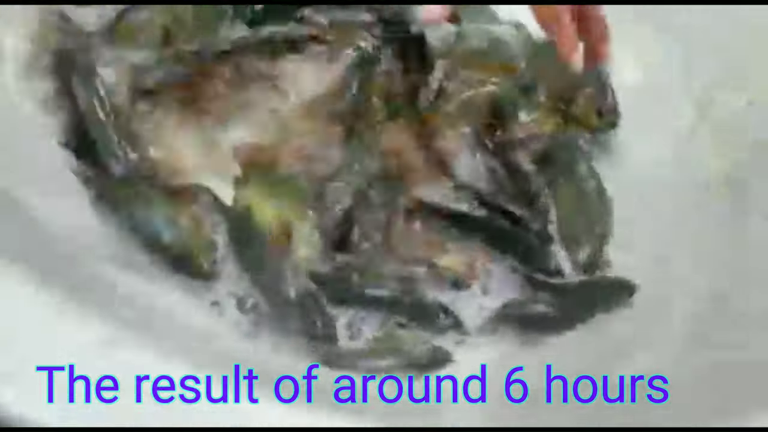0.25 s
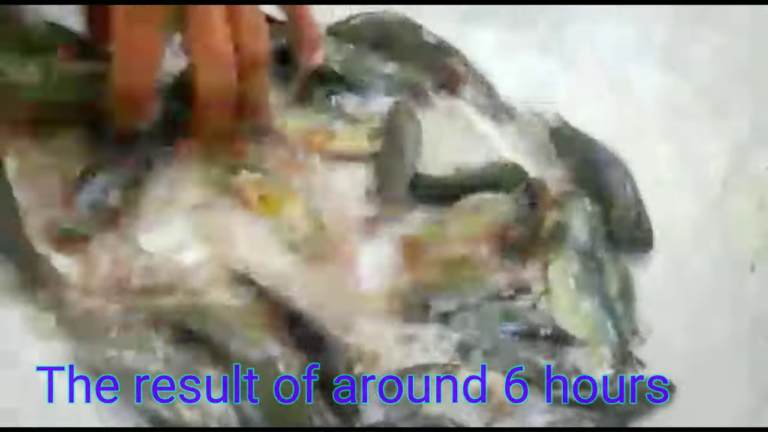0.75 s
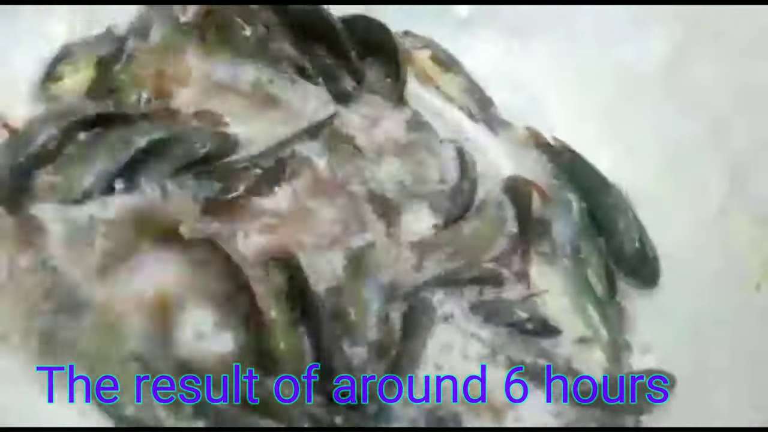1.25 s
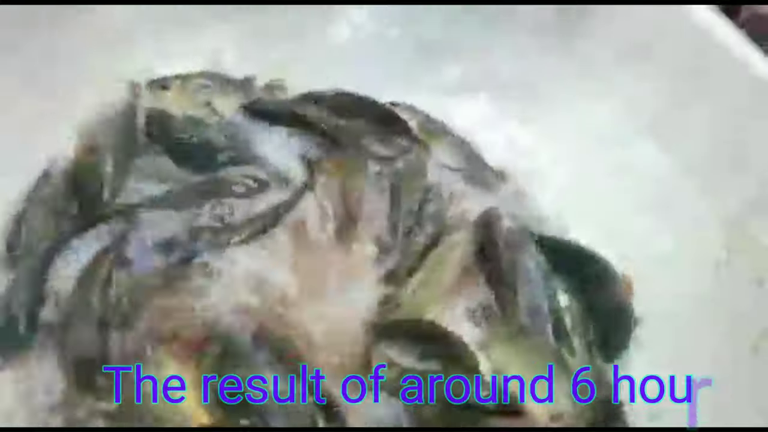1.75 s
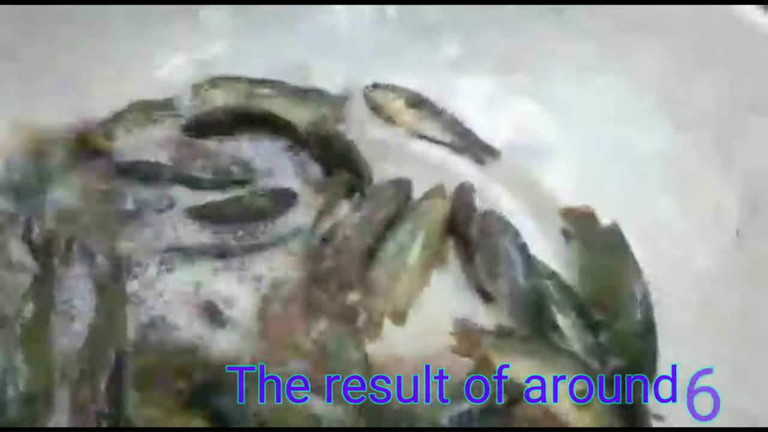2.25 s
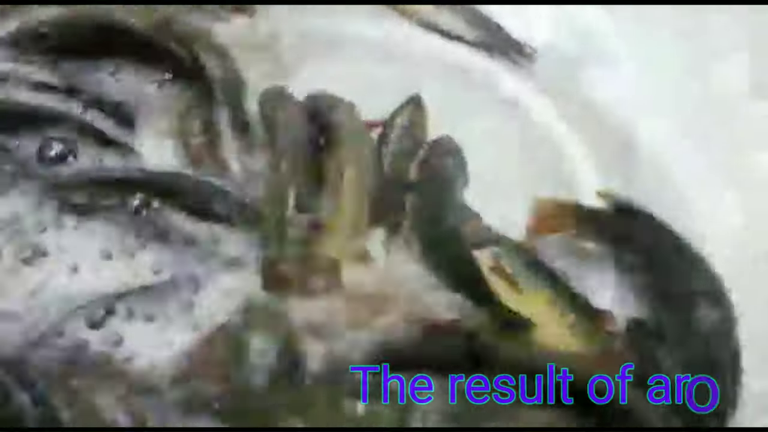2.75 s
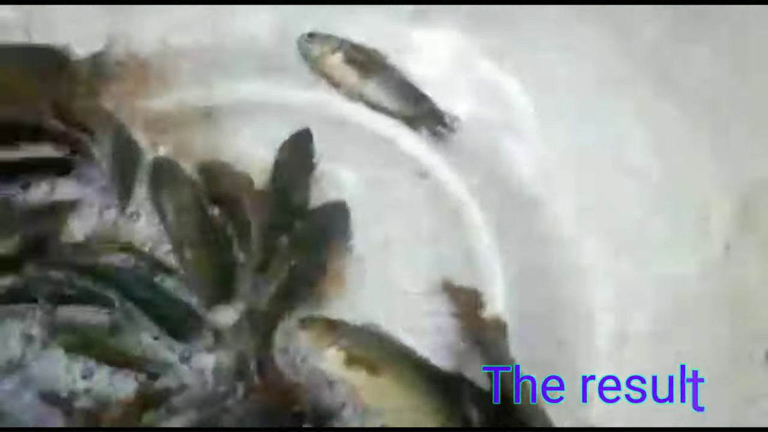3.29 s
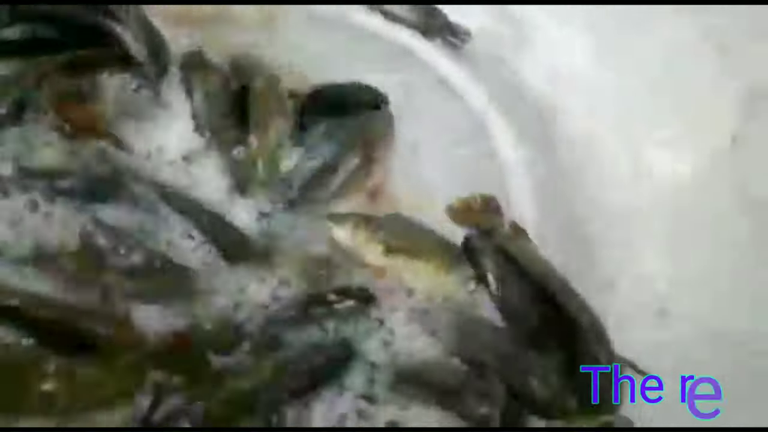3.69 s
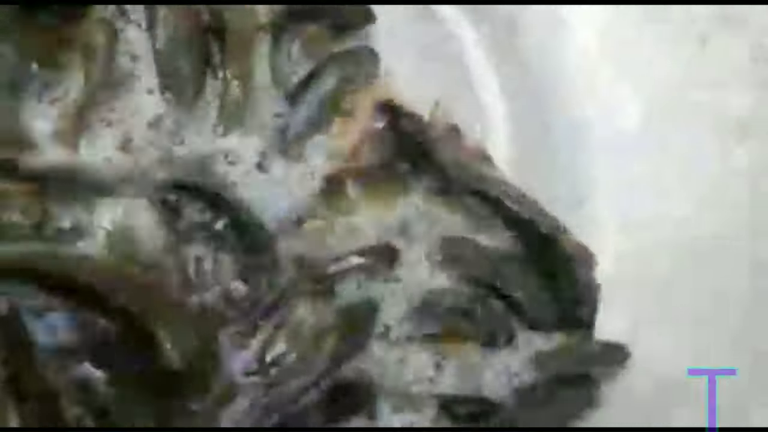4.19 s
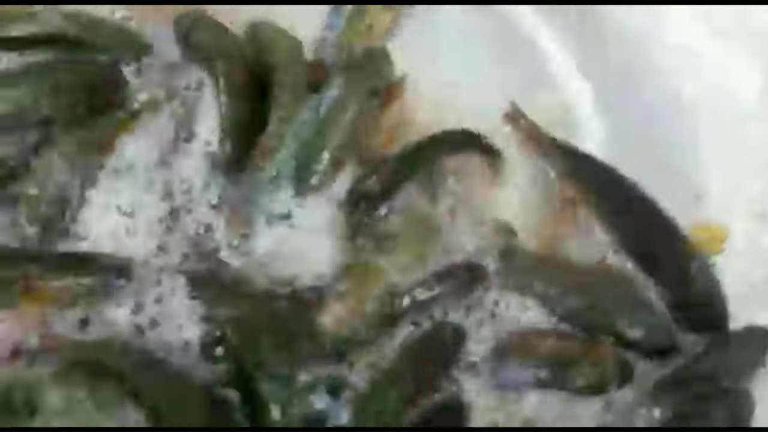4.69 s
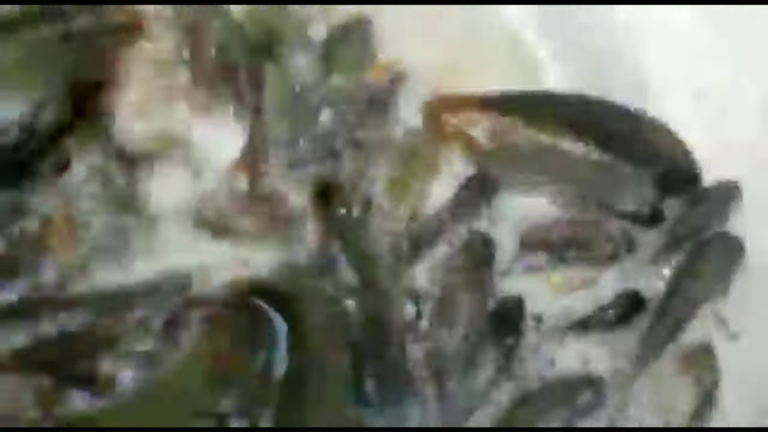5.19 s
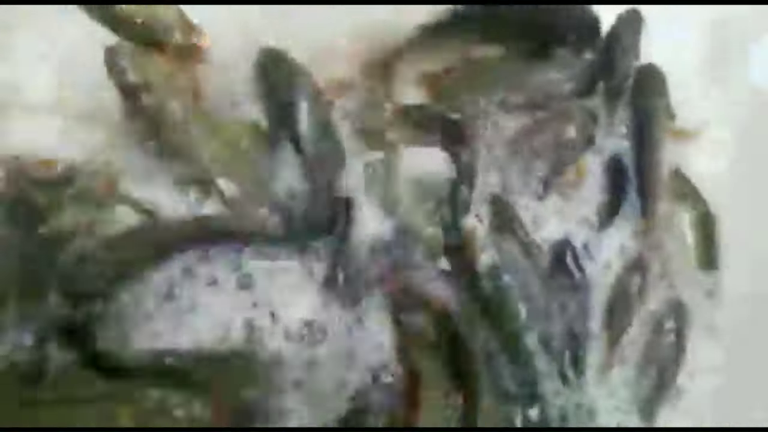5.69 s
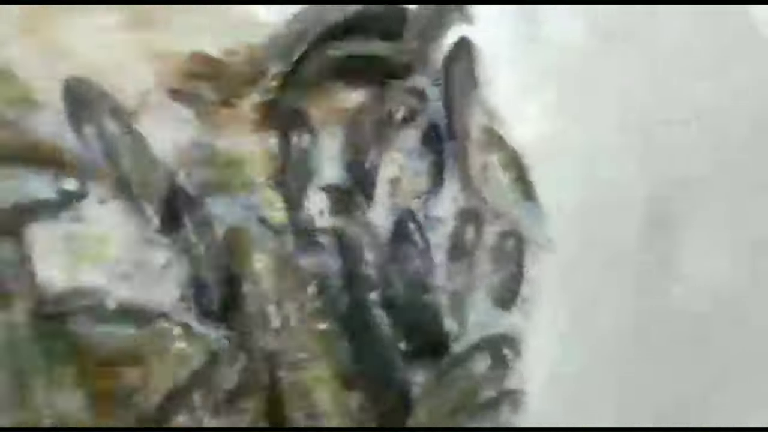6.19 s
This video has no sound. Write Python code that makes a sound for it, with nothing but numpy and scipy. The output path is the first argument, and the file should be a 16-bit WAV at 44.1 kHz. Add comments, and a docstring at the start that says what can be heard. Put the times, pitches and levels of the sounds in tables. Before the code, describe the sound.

Very close to a small plastic basin, a heap of live fish writhes in shallow foamy water. A fluttering wet crackle, high bubbly foam and faint low rumble run throughout. From 0.2 to 0.8 s tail flicks come quickly, as crisp millisecond sprays with tiny bubbles; a strong one lands near 1.1 s with a swell of squirming, and more follow until 1.7 s. Activity is sparser around 2.2 to 2.9 s, with isolated snaps. Loud blunt drop taps strike at about 3.2 s and 3.9 to 4.2 s, with low slosh near 3.5 s and soft wall knocks around 3.3 s. At 4.45 s a bump, deep plop and tap coincide. Squirms surge near 4.8 to 5 s, flicks cluster at 5.2 s, one snaps at 5.5 s, paired taps hit at 5.9 s, and wet spatters and squirming continue until 6.4 s.

```python
"""A heap of small live fish thrashes in a little foamy water in a plastic basin, close under a phone.
Wriggling bodies give a steady wet crackle of noise grains and small ringing bubbles over low sloshing.
Tail flicks are bursts of spray noise with clusters of tiny bubbles; larger air pockets plop as lower ones.
Fish bump the basin wall, heard as damped modes, and flung drops tap the phone as short pressure pulses.
The walls add brief reflections, and steady fizz and rumble lie behind it all."""
import sys
import numpy as np
from scipy import signal
from scipy.fft import rfft, irfft
from scipy.io import wavfile

SR = 44100
rng = np.random.default_rng(int(sys.argv[2]) if len(sys.argv) > 2 else 0)


def log_audio(samples):
    """Write samples as a 16-bit WAV file to the path given in sys.argv[1]."""
    # one column per channel
    frames = np.atleast_2d(samples).T
    # limit to full scale, then quantise
    limited = np.clip(frames, -1, 1)
    pcm = np.round(limited * 32767).astype(np.int16)
    wavfile.write(sys.argv[1], SR, pcm)


N = 284004
T = np.arange(N) / SR  # seconds

# Slow restlessness of the whole heap. Each row: time in seconds, level in dB.
HEAP_UNREST = [(0, -35.5), (.65, -38.5), (1, -29.5), (1.4, -40.5), (2.1, -40), (2.7, -35), (3.3, -36.5),
               (3.8, -39.5), (4.7, -45), (5.4, -40.5), (6.44, -41)]
# Longer squirms of one fish through the heap.
# Each row: height of the swell in seconds, half its span in seconds, level in dB.
SQUIRM_EVENTS = [(0.5, 0.013, -25), (0.888, 0.064, -31), (1.152, 0.02, -25.5), (1.68, 0.1, -34),
                 (2.431, 0.065, -28), (3.238, 0.05, -29.5), (3.474, 0.036, -25), (3.614, 0.05, -31),
                 (3.903, 0.032, -36), (4.164, 0.011, -27.5), (4.812, 0.026, -21.5), (4.986, 0.024, -26),
                 (5.049, 0.014, -24), (5.552, 0.064, -29), (5.784, 0.034, -30.5), (6.175, 0.061, -23),
                 (6.417, 0.0053, -21)]
# Water moving under the heap. Each row: time in seconds, level in dB.
SLOSH_LEVELS = [(0, -45.5), (1.05, -58.5), (1.5, -75), (2.35, -48), (2.9, -51), (3.48, -38.5), (3.75, -49),
                (4.7, -52.5), (5.5, -47.5), (6.44, -50.5)]
# Steady background of wet fizz and room rumble. Each row: frequency in Hz, relative gain in dB.
BACKGROUND_COLOUR = [(25, -41), (60, -3), (220, -1.5), (500, -10), (2200, -9.5), (3400, -4.5), (5500, -3.5),
                     (8000, -15.5), (15500, -29.5)]
# Drops landing on the phone, the heavy ones lower.
# Each row: landing in seconds, relative level in dB, pitch in Hz.
DROP_TAPS = [(0.097, -28, 700), (0.9055, -20.5, 325), (1.0743, -18, 386), (1.739, -24.5, 192),
             (2.603, -13, 700), (3.2077, -4, 900), (3.4193, -17.5, 577), (3.541, -18.5, 476),
             (3.6013, -17, 544), (3.8258, -17.5, 303), (3.9248, -9, 563), (3.9295, -4, 764),
             (4.0365, -5, 830), (4.041, -2.5, 390), (4.1679, -1.5, 405), (4.462, -6.5, 189),
             (4.4727, -17.5, 400), (5.8834, -2, 720), (5.8854, -3.5, 760), (5.965, -22, 216),
             (6.3812, -14, 464)]
# Larger air pockets closing between the fish. Each row: start in seconds, relative level in dB, pitch in Hz.
AIR_PLOPS = [(0.212, -19.5, 1700), (0.905, -16, 2700), (1.076, -21, 1000), (1.146, -26, 1800),
             (1.184, -9.5, 2880), (1.243, -23.5, 1460), (1.43, -16.5, 1430), (3.597, -20, 390),
             (3.774, -19.5, 107), (4.451, -8.5, 110), (4.4589, -7.5, 1080), (4.4598, -8, 1690),
             (4.783, -29, 424), (4.949, -23, 463), (4.977, -25, 1510), (5.005, -10, 550),
             (5.051, -24, 2370), (5.185, -13.5, 1290), (5.274, -17.5, 1120), (6.191, -10, 1630)]
# Tail flicks. Each row: start in seconds, level in dB, central bubble pitch in Hz, nominal length in seconds,
# relative level of the finest mist in dB.
TAIL_FLICKS = [(0.241, -19, 3180, 0.009, 0), (0.318, -21, 3830, 0.0043, -11),
               (0.366, -17.5, 4060, 0.0051, -2), (0.416, -20, 4530, 0.0038, 1),
               (0.472, -24.5, 3380, 0.0066, -6), (0.559, -22, 2920, 0.0057, -6),
               (0.637, -25.5, 3900, 0.0022, -28), (0.75, -17, 4700, 0.0022, -21),
               (0.77, -20, 4500, 0.01, -12), (0.98, -25, 3260, 0.0052, -21),
               (1.011, -26.5, 4700, 0.0059, -3), (1.075, -13, 3900, 0.0041, -2),
               (1.2, -27, 3060, 0.007, 13), (1.32, -26.5, 3560, 0.0032, -34),
               (1.441, -22, 2900, 0.0041, -7), (1.466, -22, 3230, 0.0039, -12),
               (1.511, -27, 2940, 0.004, 1), (1.637, -21.5, 2820, 0.0057, -18),
               (1.6578, -17, 5840, 0.002, -4), (1.713, -23, 3080, 0.0017, -16),
               (2.19, -17, 5700, 0.0025, -10), (2.533, -16, 3400, 0.004, -40),
               (2.575, -17.5, 3250, 0.0033, -17), (2.585, -23, 3750, 0.0069, -19),
               (2.905, -26, 3600, 0.00193, 0), (4.192, -16.5, 3140, 0.0046, -7),
               (4.22, -19, 3360, 0.0042, -1), (4.286, -18.5, 3850, 0.0037, -11),
               (4.458, -20, 3870, 0.00342, -2), (4.593, -25, 3930, 0.0016, 4),
               (4.82, -25.5, 4850, 0.0063, -6), (4.842, -24, 3160, 0.0066, -5),
               (5.187, -17, 3370, 0.009, -3), (5.2, -21.5, 4200, 0.012, -18),
               (5.204, -16.5, 2780, 0.0054, -7), (5.225, -21, 4500, 0.0057, -8),
               (5.291, -18, 3540, 0.0036, -28), (5.384, -23.5, 4930, 0.005, 1),
               (5.53, -14.5, 4170, 0.0054, -35), (6.001, -25.5, 4500, 0.005, 14),
               (6.021, -26.5, 3850, 0.0085, -19), (6.128, -21, 5250, 0.0059, -12),
               (6.189, -24.5, 3550, 0.0068, -2)]
# Colour of bursting spray. Each row: frequency in Hz, gain in dB.
SPRAY_COLOUR = [(60, -44.5), (200, -9.5), (600, -4), (1200, -12), (2100, -15.5), (3100, 2.5), (5700, -1.5),
                (8000, -9), (15500, -24.5)]
# Fish bumping the basin wall. Each row: start in seconds, relative level in dB, contact time in seconds.
WALL_BUMPS = [(1.074, -25, 0.0011), (3.124, -24.5, 0.0018), (3.259, -17.5, 0.0027), (3.339, -23, 0.0022),
              (3.356, -30, 0.00074), (4.449, -9.5, 0.005), (5.005, -16, 0.0015), (5.808, -16, 0.0028)]
# Modes of the water-loaded basin.
# Each row: settled frequency in Hz, relative level in dB, time to fall 60 dB in seconds.
WALL_MODES = [(183, -0.5, 0.093), (336, 8.5, 0.026), (536, -3, 0.046)]
# Response of the phone's microphone port. Each row: frequency in Hz, gain in dB.
PORT_RESPONSE = [(25, -32), (60, -6.5), (130, 0), (6000, 0.5), (8700, -10), (11500, 3.5), (15500, 3)]

FLOOR_DB = -44.5  # background level ahead of the microphone port
TOP_HZ = 15800  # upper limit of the phone
# A flick stirs the neighbours: level against the flick, time to build as the fish bends, time to settle.
STIR_DB, STIR_BUILD_S, STIR_SETTLE_S = -13, 0.009, 0.037


def undb(db):
    """Decibels to gain."""
    return 10 ** (np.asarray(db) / 20)


def unit(x):
    """Scale to rms 1."""
    return x / np.sqrt(np.mean(x ** 2) + 1e-18)


def add(out, at, sound):
    """Mix a sound into out at a time in seconds."""
    i = max(int(at * SR), 0)
    part = sound[:max(len(out) - i, 0)]
    out[i:i + len(part)] += part


def butter(x, hz, kind, order=2):
    """Low-pass or high-pass."""
    sos = signal.butter(order, min(hz, SR / 2 - 1), kind, fs=SR, output="sos")
    return signal.sosfilt(sos, x)


def colour(x, points, size=4096):
    """Causal filter through (Hz, dB) points, made minimum-phase by folding the cepstrum."""
    hz, db = np.transpose(points)
    bins = np.fft.rfftfreq(size, 1 / SR) + 1
    log_gain = np.interp(np.log(bins), np.log(hz), np.log(undb(db)))
    cepstrum = irfft(log_gain)[:size // 2]
    cepstrum[1:] *= 2
    impulse = irfft(np.exp(rfft(cepstrum, size)))
    return signal.fftconvolve(x, impulse)[:len(x)]


def sizes(count):
    """Many small grains and a few bigger ones, none far above the rest."""
    spread_db, most_db = 4.5, 14
    return undb(np.minimum(spread_db * rng.exponential(size=count), most_db))


def bubble(hz, cycles, glide=0.082, rise_cycles=0.41):
    """A ringing air pocket that swells quickly and climbs in pitch as it nears the surface."""
    turns = np.arange(int(cycles * SR / hz) + 2) * hz / SR
    decay = np.exp(-np.log(1000) * turns / cycles)  # down 60 dB after the given cycles
    envelope = (1 - np.exp(-turns / rise_cycles)) * decay
    return envelope * np.sin(2 * np.pi * turns * (1 + glide * turns / cycles / 2))


def cluster(hz, length, cycles, scatter, count):
    """Bubbles of like size pinched off in quick succession; the first is the strongest."""
    out = np.zeros(SR // 10)
    add(out, 0, bubble(hz, cycles))
    for k in range(1, count):
        when = rng.random() * length
        pitch = hz * 2 ** (scatter * rng.standard_normal())
        add(out, when, bubble(pitch, cycles) / np.sqrt(k + 1))
    return out


def bubbles(rate, centre_hz, octaves, cycles, length=.004, scatter=0.11):
    """A stream of small bubble clusters, each with its own pitch, at so many per second."""
    out, count = np.zeros(N), int(rate * N / SR)
    for (when, pitch, life), size in zip(rng.random((count, 3)), sizes(count)):
        hz = centre_hz * 2 ** (octaves * (2 * pitch - 1))
        group = cluster(hz, length, cycles * (.5 + life), scatter, count=3)
        add(out, when * N / SR, size * group)
    return unit(out)


def agitation():
    """How hard the heap moves: its slow unrest, a swell for each squirm and a stir round each flick."""
    power = undb(np.interp(T, *np.transpose(HEAP_UNREST))) ** 2
    for at, length, db in SQUIRM_EVENTS:
        swell = np.hanning(int(2 * length * SR))
        add(power, at - length, (undb(db) * swell) ** 2)
    t = T[:SR // 2] - T[SR // 10]  # the stir begins ahead of the flick
    stir = np.exp(np.minimum(t / STIR_BUILD_S, -t / STIR_SETTLE_S))
    for at, db, *_ in TAIL_FLICKS:
        add(power, at + t[0], (undb(db + STIR_DB) * stir) ** 2)
    # the writhing comes in uneven flutters
    flutter_s, flutter_db = .02, 1.4
    knots = np.arange(0, T[-1], flutter_s)
    flutter = np.interp(T, knots, rng.standard_normal(len(knots)))
    return np.sqrt(power) * undb(flutter_db * flutter)


def wriggling(crackle_db=-7.0, foam_db=-5.0, plip_db=-14, prick_db=-24):
    """Slippery bodies part and smack together; foam fizzes and pricks between them and the gaps plip as they fill."""
    smacks_per_s, smear_s = 380, .0014
    count = int(smacks_per_s * N / SR)
    smacks = np.zeros(N)
    smacks[rng.integers(0, N, count)] = sizes(count) ** 2
    # each smack dies away as a short grain of noise
    power = signal.lfilter([1], [1, -np.exp(-1 / (smear_s * SR))], smacks)
    crackle = unit(colour(np.sqrt(power) * rng.standard_normal(N), SPRAY_COLOUR))
    foam = bubbles(rate=250, centre_hz=3960, octaves=0.55, cycles=26)
    plips = bubbles(rate=110, centre_hz=1710, octaves=0.6, cycles=13)
    pricks = bubbles(rate=14, centre_hz=10900, octaves=0.34, cycles=4.5)
    wet = undb(crackle_db) * crackle + undb(foam_db) * foam
    wet += undb(plip_db) * plips + undb(prick_db) * pricks
    return agitation() * wet


def sloshing():
    """Low, heavily damped bubbles run together as gurgles in the water under the heap."""
    gurgles = bubbles(rate=170, centre_hz=275, octaves=0.68, cycles=3.2)
    return undb(np.interp(T, *np.transpose(SLOSH_LEVELS))) * gurgles


def background():
    """Steady noise coloured as distant wet fizz and room rumble."""
    return undb(FLOOR_DB) * unit(colour(rng.standard_normal(N), BACKGROUND_COLOUR))


def taps(push=1.32, push_cycles=0.084, pull=0.8, pull_cycles=0.21, low_hz=170, lead=0.001233,
         splat_db=-16, splat_s=0.00076):
    """A drop presses sharply on the phone with a tiny splat, then sucks back as it spreads."""
    out, t = np.zeros(N), T[:SR // 20] - lead  # zero at the landing
    for at, db, hz in DROP_TAPS:
        press = np.exp(-np.abs(t) * hz / push_cycles)
        spread = np.maximum(t, 0) * hz / pull_cycles
        suck = spread * np.exp(1 - spread)
        noise = unit(colour(rng.standard_normal(len(t)), SPRAY_COLOUR))
        splat = undb(splat_db) * np.exp(-np.abs(t) / splat_s) * noise
        add(out, at - lead, undb(db) * (push * press - pull * suck + splat))
    return butter(out, low_hz, "high", order=1)


def plops(length=0.0048, cycles=12, scatter=0.33, damping_hz=250):
    """Larger pockets of air between the fish break into a few bubbles."""
    out = np.zeros(N)
    for at, db, hz in AIR_PLOPS:
        # soft bodies damp the big low pockets most
        damped_cycles = cycles * hz / (hz + damping_hz)
        add(out, at, undb(db) * cluster(hz, length, damped_cycles, scatter, count=3))
    return out


def flicks(ring=1.0, cycles=17, scatter=0.08, focus=4.8, focus_q=3.4, spatter_db=5.5, tail_db=-15,
           tail_s=0.0053, mist_hz=8500, mist_db=20, fall_db=-10):
    """Each flick tears a film of water: a burst of spray and a cluster of tiny bubbles, then droplets falling back."""
    out, t = np.zeros(N), T[:SR // 10]
    rise_s, droplet_s, fall_s = .0007, .0008, .03
    knots = np.arange(0, t[-1], droplet_s)
    for at, db, hz, length, fine_db in TAIL_FLICKS:
        burst = np.exp(-(t / (0.74 * length)) ** 2) + undb(tail_db) * np.exp(-t / tail_s)
        envelope = (1 - np.exp(-t / rise_s)) * burst
        # the film breaks up droplet by droplet, each of its own size
        droplets = np.interp(t, knots, rng.standard_normal(len(knots)))
        grit = rng.standard_normal(len(t)) * undb(spatter_db * droplets)
        spray = colour(grit * envelope, SPRAY_COLOUR)
        # the finest mist is spikier, like pinprick ticks
        ticks = grit * unit(rng.exponential(size=len(t)) ** 2)
        mist = butter(colour(ticks * envelope, SPRAY_COLOUR), mist_hz, "high", order=4)
        mist *= undb(fine_db + mist_db)
        # the bubble cloud lifts the spray round its own pitch
        lifted = signal.lfilter(*signal.iirpeak(hz, focus_q, fs=SR), spray)
        body = butter(spray, mist_hz, "low", order=4) + focus * lifted
        cloud = cluster(hz, 0.87 * length, cycles, scatter, count=6)
        wet = unit(body + mist) + ring * unit(cloud)
        # flung droplets land one by one, each with a pitch of its own
        for when, octave in rng.random((4, 2)):
            drop = cluster(hz * 2 ** (2 * octave - 1.2), length, cycles, scatter, count=2)
            add(wet, length + when * fall_s, undb(fall_db) * (1 - when) * unit(drop))
        # total energy follows the nominal length
        add(out, at, undb(db) * wet * np.sqrt(length * SR) / np.linalg.norm(wet))
    return out


def bumps(stretch=0.33, settle_s=0.019):
    """A soft body pushes the basin wall; longer contact dulls the ring, which sinks as the wall relaxes."""
    out, t = np.zeros(N), T[:SR // 6]
    bent = np.cumsum(1 + stretch * np.exp(-t / settle_s)) / SR
    ring = np.zeros(len(t))
    for hz, db, t60 in WALL_MODES:
        ring += undb(db) * np.sin(2 * np.pi * hz * bent) * np.exp(-np.log(1000) * t / t60)
    for at, db, contact in WALL_BUMPS:
        push = np.sin(np.pi * np.minimum(t / contact, 1))
        add(out, at, undb(db) * signal.fftconvolve(ring, push / push.sum()))
    # a small wall radiates little deep bass
    return butter(out, 230, "high")


def basin(x, t60=0.083, wet_db=-12):
    """The plastic walls throw back a short scatter of reflections."""
    t = T[:SR // 4]
    after_gap = t > .0015  # seconds to the nearest wall and back
    echoes = rng.standard_normal(len(t)) * np.exp(-np.log(1000) * t / t60) * after_gap
    return x + undb(wet_db) * signal.fftconvolve(x, echoes / np.linalg.norm(echoes))[:N]


def scene():
    """Splashes in the basin, bumps on its wall, drops on the phone and the background."""
    splashes = wriggling() + sloshing() + plops() + flicks()
    return (basin(splashes) + background() + taps() + bumps())[None]


def record(dry):
    """The microphone port colours the sound; the phone clips at full scale and cuts the top."""
    sound = np.clip(colour(dry[0], PORT_RESPONSE), -1, 1)[None]
    top_cut = signal.ellip(8, .2, 70, TOP_HZ, fs=SR, output="sos")
    return signal.sosfilt(top_cut, sound)


dry = scene()
out = record(dry)
log_audio(out)
```